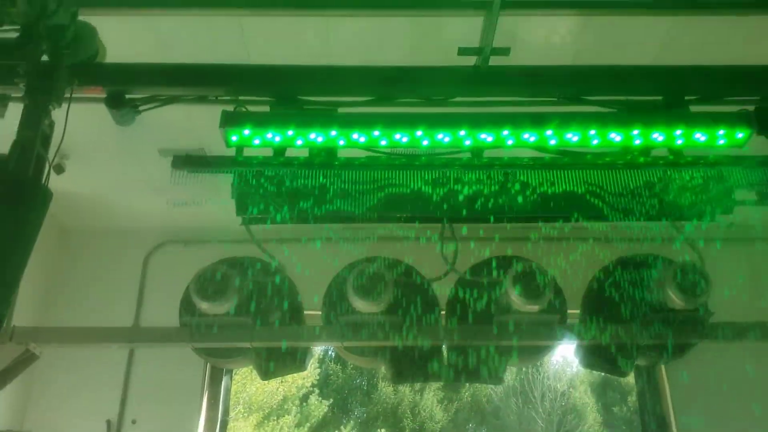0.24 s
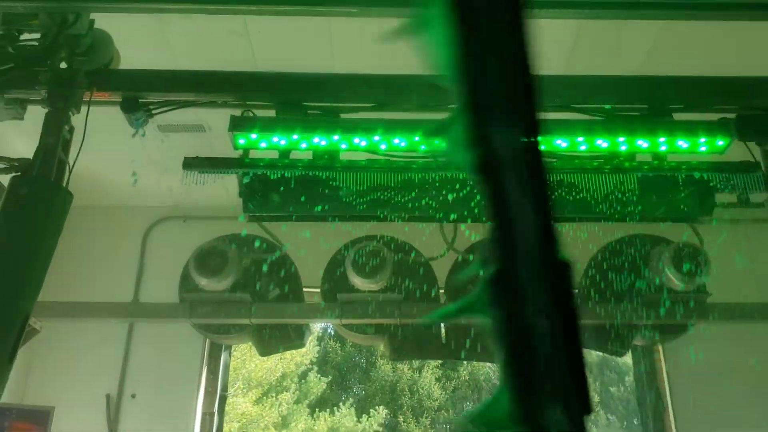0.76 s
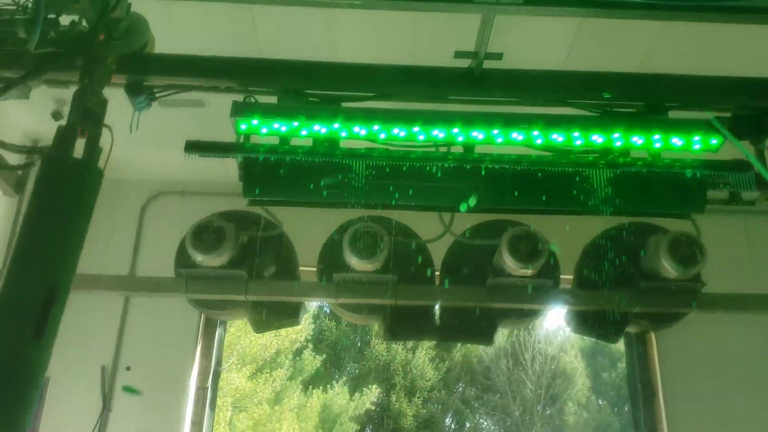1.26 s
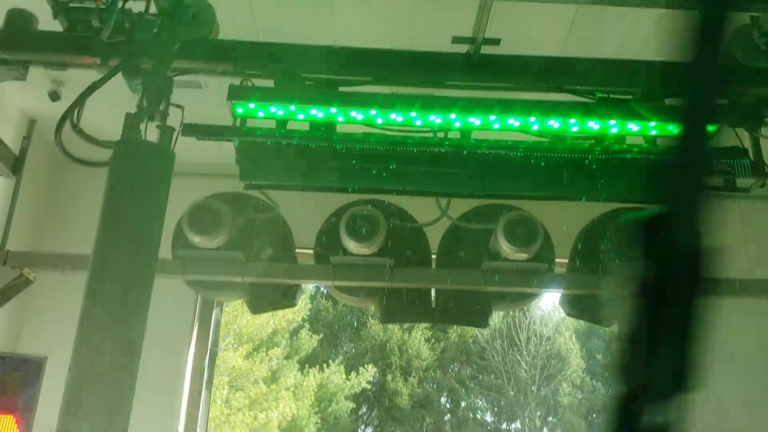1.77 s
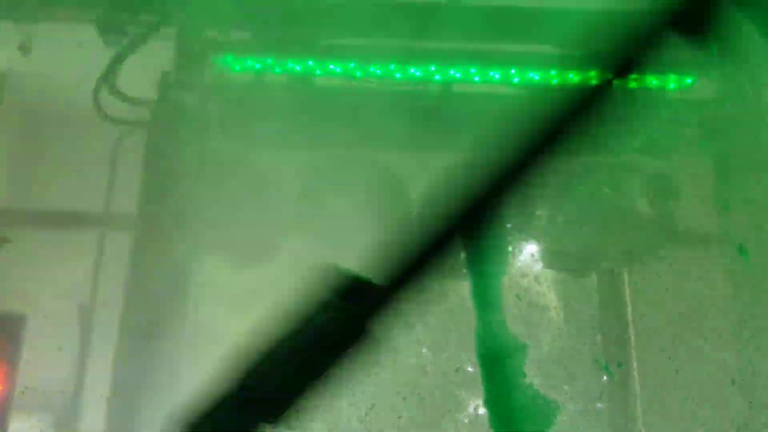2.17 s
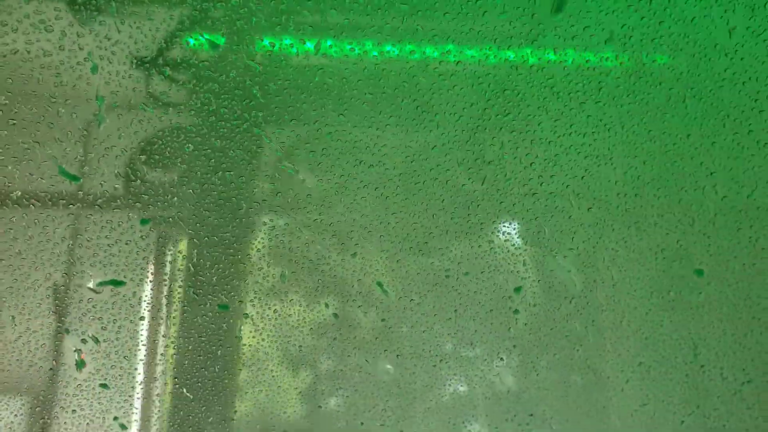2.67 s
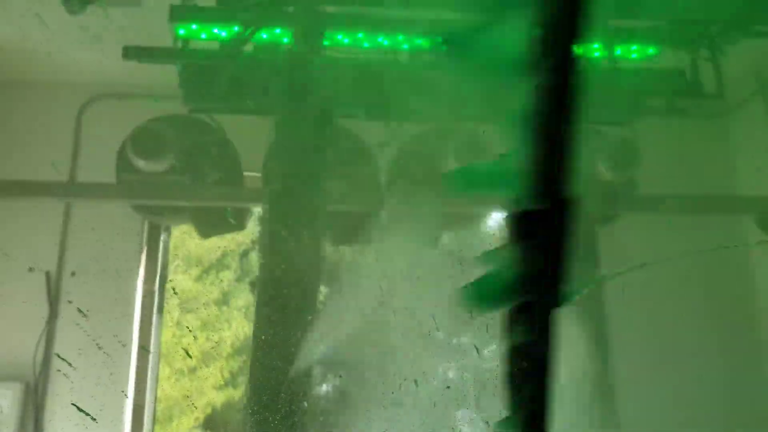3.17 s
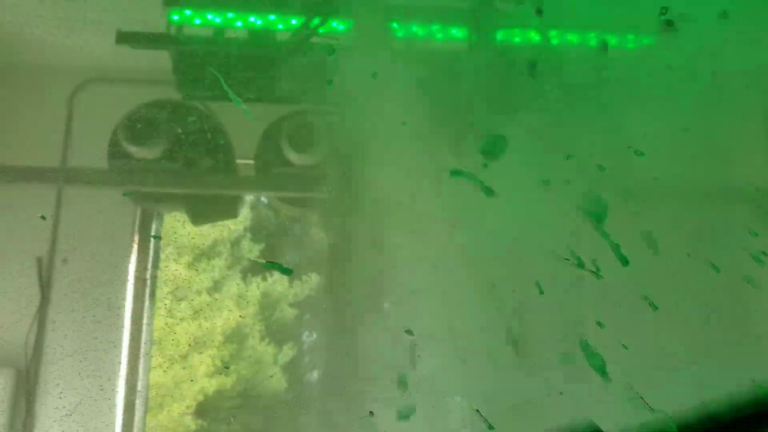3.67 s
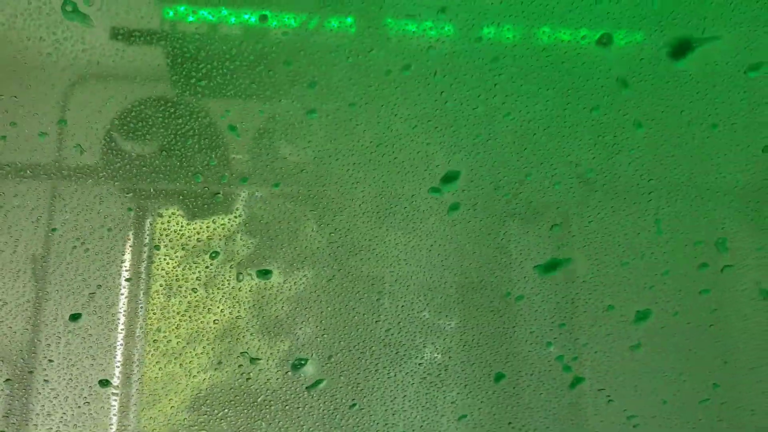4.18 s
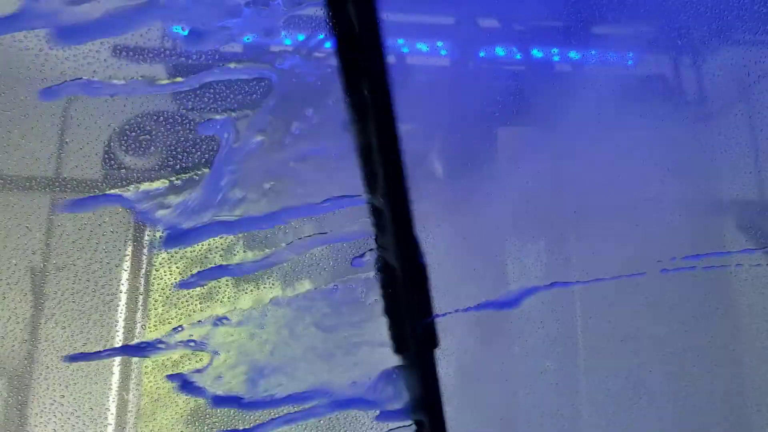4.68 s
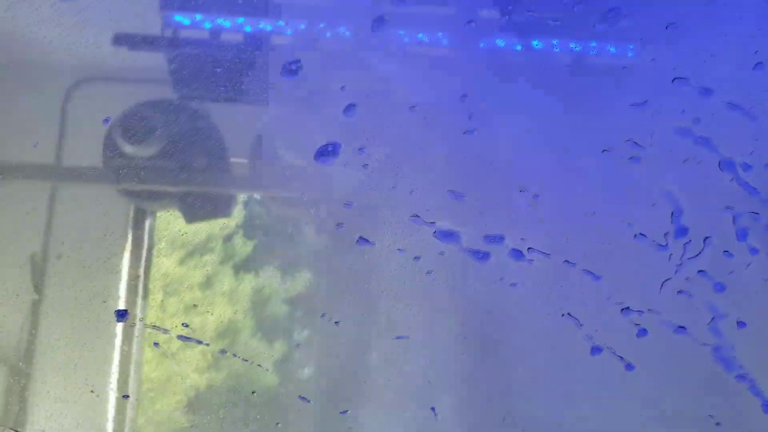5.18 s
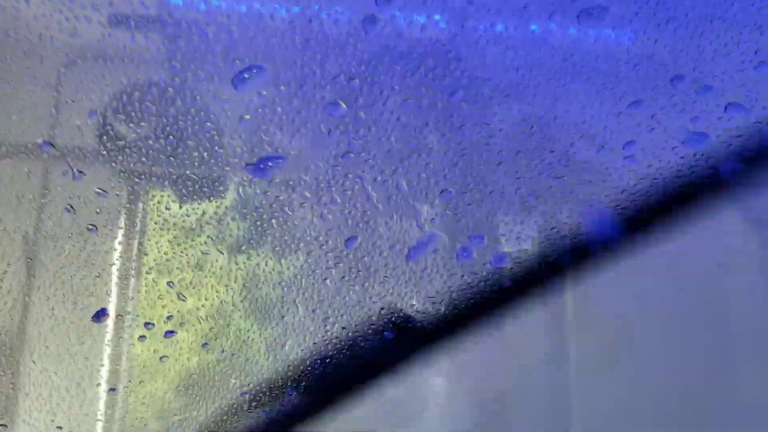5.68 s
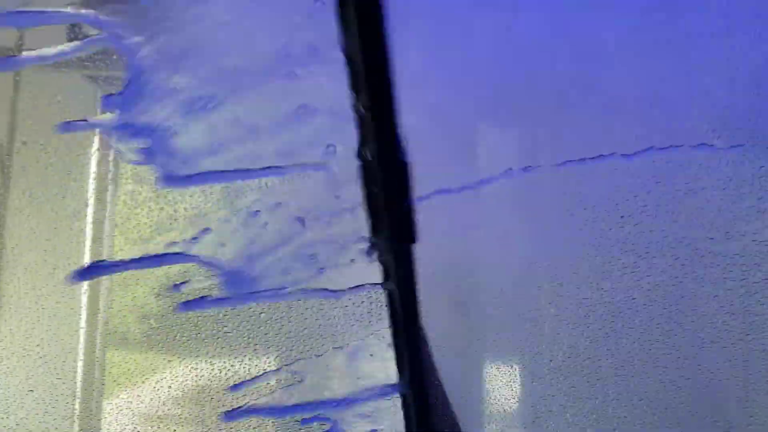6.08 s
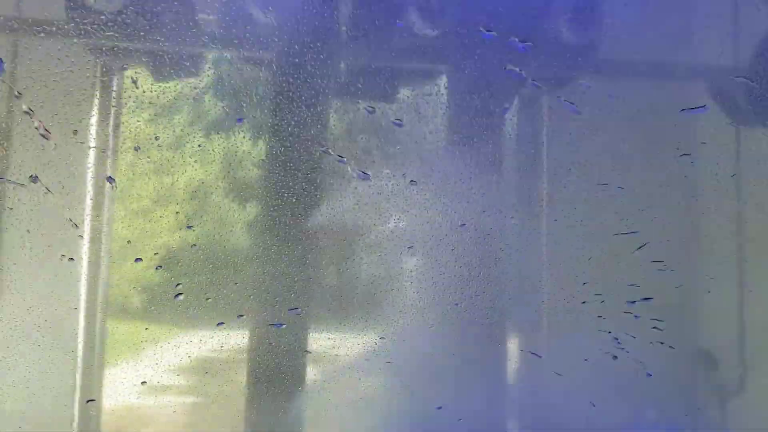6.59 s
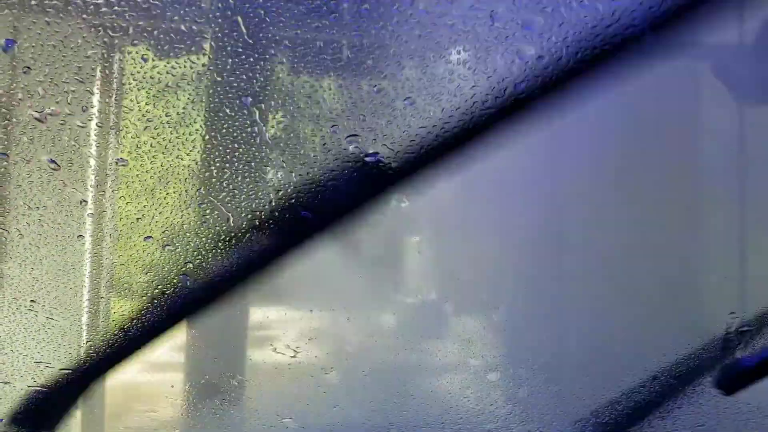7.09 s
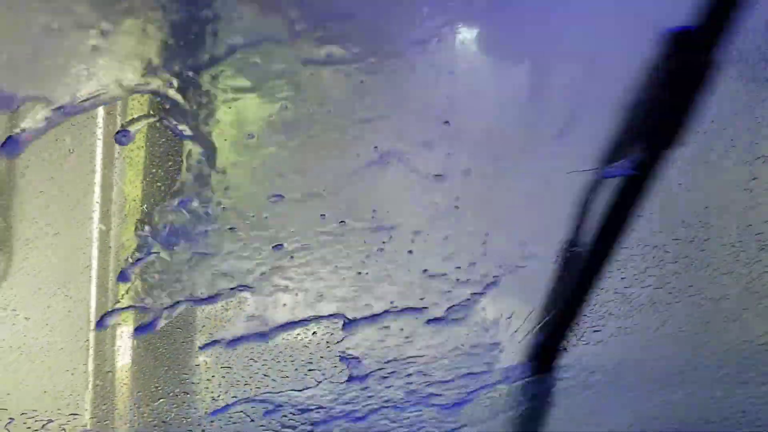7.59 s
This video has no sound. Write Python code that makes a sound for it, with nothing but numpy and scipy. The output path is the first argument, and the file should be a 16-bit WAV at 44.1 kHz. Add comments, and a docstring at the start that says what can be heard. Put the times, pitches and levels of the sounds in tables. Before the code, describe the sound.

The sound is heard from inside a closed car idling in a wash bay, with a low engine hum and a dull hiss of distant sprays. In the first second and a half the wipers give several dull slaps with a very faint motor whine. Around 1.4 to 1.6 seconds the nozzles spit and a few heavy drops tick on the windshield. Near 2 seconds a gush of water hits and makes the car body hum briefly. From then on, water drums on the roof and glass as a dense low rumble beneath a softer misty hiss. Wipers thump again at about 2.7, 4, 4.4 and 5.4 seconds. At 5.5 seconds a jet opens suddenly on the left, hissing in surges with a faint whistle through the door seal. It continues over the drumming, with a few small spits and a last wiper slap near 7.7 seconds.

```python
"""A car idles in a wash bay, heard from inside the cabin; far sprays hiss dully through shut windows.
From the start the wipers whine faintly and slap, ringing cowl and glass. Air in the line makes the
nozzles spit and heavy drops tick on the glass; near 2 s the first gush sets the body humming.
Water then drums on roof and windscreen in a hiss of mist, with more wiper slaps. From 5.5 s a surging
jet hisses against the left side and whistles faintly through the door seal."""
import sys
import numpy as np
from scipy import signal
from scipy.fft import irfft
from scipy.io import wavfile
from scipy.ndimage import uniform_filter1d

SR = 44100
rng = np.random.default_rng(int(sys.argv[2]) if len(sys.argv) > 2 else 0)


def transcribe(signal):
    """Save signal, clipped to [-1, 1], as a 16-bit WAV file at the path in sys.argv[1]."""
    frames = np.atleast_2d(signal).T
    limited = np.clip(frames, -1, 1)
    pcm = np.round(limited * 32767).astype(np.int16)
    wavfile.write(sys.argv[1], SR, pcm)


N = 345671

# stereo balance of the water, treble leaning left: pitch_hz, left_over_right_db
CABIN_BALANCE = [(60, 0), (200, 0.3), (700, 1), (1300, 0), (2400, 1), (3300, -1), (4400, 2), (5500, 5),
                 (8100, 9.5), (11000, 5), (13500, 8), (15500, 9)]


def gain_of(db):
    """Decibels to gain."""
    return 10 ** (np.asarray(db) / 20)


def panned(left_over_right_db):
    """Left and right gains, as a column."""
    return gain_of([[left_over_right_db / 2], [-left_over_right_db / 2]])


def unit_rms(x):
    """Scales to rms 1."""
    return x / np.sqrt(np.mean(x ** 2) + 1e-20)


def drift(white, size):
    """Smooths white noise over size samples into a slow wander of rms 1."""
    return unit_rms(uniform_filter1d(uniform_filter1d(white, size), size))


def at_pitch(points, hz):
    """Reads a table on a log-frequency axis."""
    point_hz, value = np.transpose(points)
    return np.interp(np.log(hz + 1), np.log(point_hz + 1), value)


def curves(rows):
    """One sample-by-sample curve per column after the time; the end values hold."""
    time_s, *columns = np.transpose(rows)
    return [np.interp(np.arange(N) / SR, time_s, column) for column in columns]


def hump(middle_s, length_s):
    """A smooth rise from 0 to 1 and back."""
    return np.cos(np.pi * np.clip((np.arange(N) / SR - middle_s) / length_s, -.5, .5)) ** 2


def arch(start_s, end_s):
    """A broad swell with steep ends."""
    return np.sin(np.pi * np.clip((np.arange(N) / SR - start_s) / (end_s - start_s), 0, 1)) ** .5


def burst(hit_s, build_s, build_db, t60_s):
    """Envelope of a blow: swells to build_db, jumps to 1 at the hit, then dies away."""
    t = np.arange(N) / SR - hit_s
    swell = gain_of(build_db) * np.clip(1 + t / build_s, 0, 1) ** .5
    return np.where(t < 0, swell, gain_of((-60 * t / t60_s).clip(-150, 0)))


def noise(colour, size, patchy_db, flicker_db, balance=CABIN_BALANCE):
    """Stereo noise of rms 1 in grains of size samples, with drifting patches and an overall flicker."""
    # how alike left and right are: pitch_hz, correlation
    stereo_likeness = [(40, .97), (80, .93), (130, .93), (200, .9), (380, .78), (700, .55), (1000, .4),
                       (1400, .25), (2400, .05), (15000, 0)]
    # phase between two spaced listening points: pitch_hz, left_lead_rad
    left_lead = [(40, 0.049), (70, 0.042), (130, 0.03), (300, 0.1), (780, 1.18), (1120, 1.95), (1500, 2.9)]
    hop = size // 4
    frames, hz = N // hop + 5, np.fft.rfftfreq(size, 1 / SR)
    a, b, c, d, patches = rng.standard_normal((5, frames, len(hz)), dtype=np.float32)
    patches = unit_rms(uniform_filter1d(uniform_filter1d(patches, size=8, axis=0), size=8, axis=1))
    flicker = unit_rms(uniform_filter1d(rng.standard_normal(frames), size=4))[:, None]
    likeness = at_pitch(stereo_likeness, hz)
    left = a + 1j * b
    right = likeness * left + np.sqrt(1 - likeness ** 2) * (c + 1j * d)
    gain = gain_of(at_pitch(colour, hz) + patchy_db * patches + flicker_db * flicker)
    side = gain_of(at_pitch(balance, hz) / 2)
    lead = np.exp(1j * at_pitch(left_lead, hz))
    grains = irfft(np.array([left * side * lead, right / side]) * gain) * np.hanning(size)
    quarters = grains.reshape(2, frames, 4, hop)
    overlapped = sum(quarters[:, 3 - k:frames - k, k] for k in range(4)).reshape(2, -1)[:, :N]
    return overlapped / np.sqrt(np.mean(overlapped.mean(0) ** 2))


def far_sprays():
    """Dull hiss from the bay, hollowed by the shut windows; its treble comes and goes early on."""
    # distant spray: time_s, level_db, treble_boost_db
    levels = [(0, -58.5, 7.5), (.3, -59, 7.5), (.45, -59.5, 3.5), (.7, -60, 4), (1.0, -61.5, 1),
              (1.3, -61.5, 2.5), (1.8, -59, 7), (2.3, -57, 0), (2.38, -57.5, 0), (2.46, -60.5, 4),
              (2.6, -57.5, 0)]
    # its spectrum through the glass: pitch_hz, level_db
    colour = [(530, -6.5), (880, -25), (960, -46), (1300, -36), (1550, -7.5), (1920, -11.5), (2500, -9),
              (2950, -7), (3850, -7.5), (5200, -13), (6800, -19.5), (7400, -23.5), (8100, -36), (8700, -30),
              (9200, -23.5), (9880, -23), (11500, -29), (12800, -35), (13500, -49), (15700, -43)]
    level_db, boost_db = curves(levels)
    hiss = noise(colour, size=512, patchy_db=1.2, flicker_db=.6)
    treble = signal.sosfiltfilt(signal.butter(4, 8500, "highpass", fs=SR, output="sos"), hiss)
    return gain_of(level_db) * (hiss + (gain_of(boost_db) - 1) * treble)


def engine():
    """Firing orders in step, so each beat is a downward pulse; the higher ones waver more."""
    # idle speed: time_s, firing_hz
    idle = [(0, 25.1), (1.05, 24.65), (7.84, 24.55)]
    # harmonics of the firing rate: order, level_db
    orders = [(1, -50), (2, -33), (3, -40), (4, -43), (5, -41), (6, -52), (7, -50), (8, -56)]
    firings = np.cumsum(curves(idle)[0]) / SR
    t, out = np.arange(N) / SR, 0
    coarse_t = t[::200]
    for order, db in orders:
        rates_hz, phases = rng.uniform(0.364, 4, (8, 1)), rng.random((8, 1))
        sways = np.sin(2 * np.pi * (rates_hz * coarse_t + phases))
        waver_db = 0.17 * order * np.interp(t, coarse_t, sways.sum(0) / 2)
        lead_rad = order * np.array([[.05], [-.05]])
        phase = 2 * np.pi * order * (firings + 1 / 8) + lead_rad
        out -= gain_of(db + waver_db) * np.sqrt(2) * np.cos(phase)
    return out * panned(1.2)


def wiper_motor():
    """Faint gear whine on the first strokes, wobbling with the uneven gears."""
    # one whine a stroke: start_s, end_s, pitch_hz, level_db
    strokes = [(.02, .18, 800, -70), (.26, .35, 872, -66), (.44, .55, 730, -65), (.95, 1.1, 790, -70),
               (1.15, 1.21, 870, -64)]
    t, out = np.arange(N) / SR, 0
    wobble_rad = 0.88 * drift(rng.standard_normal(N), size=900)
    for start_s, end_s, hz, db in strokes:
        out += gain_of(db) * np.sqrt(2) * arch(start_s, end_s) * np.sin(2 * np.pi * hz * t + wobble_rad)
    return out * panned(3)


def hum_and_whistle():
    """While the spray builds, a panel's hum and a thin whistle swell, waver and fade."""
    # the two tones: start_s, end_s, pitch_hz, level_db, waver_rad
    tones = [(1.527, 2.407, 159.1, -41.5, 0.35), (1.95, 2.42, 3220, -67, 3.7)]
    t, out = np.arange(N) / SR, 0
    for start_s, end_s, hz, db, waver_rad in tones:
        size = int(4e4 / np.sqrt(hz))  # the higher tone wavers faster
        waver, throb = (drift(white, size) for white in rng.standard_normal((2, N)))
        level = gain_of(db + 3.5 * throb) * arch(start_s, end_s)
        out += level * np.sqrt(2) * np.sin(2 * np.pi * hz * t + waver_rad * waver)
    return out


def mist():
    """Spray all round the car: smooth hiss, fizz, haze and sparkle, rising as the nozzles prime."""
    # body of the spray: time_s, hiss_db, fizz_db
    spray_levels = [(1.2, -74, -97), (1.5, -68, -88), (1.62, -70, -74), (1.7, -63.5, -71),
                    (1.79, -62.5, -70), (1.85, -59, -66), (1.92, -63, -68), (1.96, -50, -61),
                    (2.04, -52, -63), (2.09, -58, -65), (2.18, -57.5, -66), (2.3, -64, -69),
                    (2.43, -63, -70), (2.55, -63, -68), (3.05, -60, -68), (3.3, -57, -68.5),
                    (3.6, -56.5, -67), (4, -59, -69), (4.75, -58.5, -69), (5.45, -59, -69),
                    (5.55, -55, -68), (7.84, -58.5, -72)]
    # even haze of fine droplets: time_s, level_db
    haze_levels = [(1.8, -78), (2.3, -71), (2.8, -68), (3.2, -64), (3.8, -65), (4.2, -65), (4.8, -65.5),
                   (5.4, -66), (6.2, -71), (7.84, -68)]
    # finest sparkle, surging as water sweeps the glass: time_s, level_db
    sparkle_levels = [(1.65, -74), (1.77, -81), (1.84, -68), (1.91, -74), (1.92, -72), (2.16, -70),
                      (2.3, -79), (2.37, -65), (2.42, -76), (2.6, -84), (2.73, -78), (3.1, -87),
                      (3.15, -73), (4.39, -77), (4.49, -73), (4.6, -81), (4.75, -73), (4.8, -79),
                      (4.91, -72), (5.03, -80), (5.1, -74), (5.27, -79), (5.37, -75), (5.99, -72.5),
                      (6.06, -78), (6.34, -74.5), (6.36, -70), (6.51, -81.5), (6.61, -71), (6.75, -75),
                      (6.89, -73), (6.91, -65), (6.96, -77), (7.41, -72.5), (7.44, -79), (7.68, -73),
                      (7.7, -61), (7.72, -71.5), (7.79, -79), (7.84, -78)]
    # spectra of hiss, fizz and sparkle: pitch_hz, level_db
    hiss_colour = [(530, -19), (900, 0.5), (1010, -2), (1410, -2.5), (1530, -5.5), (2140, -4.5),
                   (2820, -15), (3270, -10.5), (5350, -6.5), (6250, -31), (6850, -31), (8000, -37),
                   (10400, -57), (17600, -120)]
    fizz_colour = [(5000, -36), (7500, -4.5), (8660, -4), (9600, -6), (11500, 1), (12600, -4), (13500, -14),
                   (15700, -23)]
    sparkle_colour = [(11000, -26), (12500, -3), (13300, 0), (14200, -3), (15000, -6), (15700, -8)]
    hiss_db, fizz_db = curves(spray_levels)
    hiss = gain_of(hiss_db) * noise(hiss_colour, size=512, patchy_db=2.5, flicker_db=0.14)
    fizz = gain_of(fizz_db) * noise(fizz_colour, size=512, patchy_db=1.5, flicker_db=.3)
    low_cut = signal.butter(2, 1500, "highpass", fs=SR, output="sos")
    haze = gain_of(curves(haze_levels)[0]) * signal.sosfilt(low_cut, rng.standard_normal((2, N)))
    primed = np.clip((np.arange(N) / SR - 1.55) / .15, 0, 1)
    sparkle = noise(sparkle_colour, size=512, patchy_db=2.0, flicker_db=-1.0)
    return hiss + fizz + haze + primed * gain_of(curves(sparkle_levels)[0]) * sparkle


def drop_ticks():
    """Heavy drops ring the modes of the glass, each a little differently."""
    # drops landing: start_s, level_db, centre_hz, octave_away_db
    drops = [(1.3645, -40, 4000, -4), (1.463, -55, 3800, -3), (1.6045, -37, 2300, -22),
             (2.3825, -37, 3000, -2)]
    # modes of the glass: pitch_hz, level_db, t60_s
    glass_modes = [(850, -15, 0.037), (1160, -9, 0.049), (1620, -4.5, 0.026), (2000, -5, 0.023),
                   (2330, -6.5, 0.045), (2660, -6.5, 0.027), (3500, -0.5, 0.023), (4350, -6, 0.025),
                   (4540, -3, 0.03), (5200, -6, 0.026)]
    hz, mode_db, t60_s = np.transpose(glass_modes)[:, :, None]
    out, t = np.zeros((2, N + SR)), np.arange(SR // 10) / SR
    attack = np.minimum(t / 0.0005, 1)
    for start_s, db, centre_hz, octave_away_db in drops:
        phase = rng.random((len(hz), 1)) + 1.5 * rng.random((2, len(hz), 1))  # roughly in step
        struck_db = db + mode_db + octave_away_db * np.log2(hz / centre_hz) ** 2
        modes = gain_of(struck_db - 60 * t / t60_s) * np.sin(2 * np.pi * hz * t + phase)
        out[:, round(start_s * SR):][:, :len(t)] += modes.sum(1) * attack
    return out[:, :N]


def nozzle_spits():
    """Air in the line: a hiss builds, the slug of water lands, and it is over. The long one near 1.93 s is the
    hiss of the first gush pouring down."""
    # spits: hit_s, body_db, snap_over_body_db, fizz_over_body_db, t60_s, build_s, build_db,
    # left_over_right_db
    spits = [(0.627, -51, -11, -36, 0.14, 0.0047, -22, 1),
             (1.3652, -45.5, -1, -8.5, 0.069, 0.032, -11.5, 0), (1.462, -54.5, 1, -12, 0.074, .005, -10, 1),
             (1.565, -63, 4, 0, 0.22, .004, -26, 2), (1.606, -47.5, -0.5, 0.5, 0.028, 0.024, -8, -2),
             (1.926, -51.5, 2.5, -5, 1, 0.013, -16, -1), (2.095, -69, 14, -6, 0.26, .02, -8, -1),
             (3.37, -57.5, 4.5, -14, 0.065, 0.027, -5.5, 0), (4.05, -62, 10, -9, 0.045, 0.014, -11, 0),
             (2.382, -49.5, 1, -2, 0.025, 0.045, -8, -2), (6.605, -49, -7, -16, 0.063, 0.033, -13, -4),
             (6.909, -53.5, -5, -2, .06, .015, -8, -0.5), (7.699, -60, -2, 3, .06, .01, -8, 1)]
    # spectra of a spit's body, snap and top fizz: pitch_hz, level_db
    body_colour = [(600, 2.5), (1100, -6), (1800, 3.5), (2400, -5.5), (3000, -21), (4000, -36)]
    snap_colour = [(2000, -34), (2800, 2.5), (3600, 3), (4600, -0.5), (5600, -0.5), (6500, -11.5),
                   (8000, -19)]
    fizz_colour = [(6500, -34), (8500, -8), (10000, 1), (11200, 0), (12300, 9), (13300, -2), (14300, -3),
                   (15700, -12)]
    body, snap, fizz = (noise(colour, size=256, patchy_db=.8, flicker_db=.4)
                        for colour in (body_colour, snap_colour, fizz_colour))
    out = np.zeros((2, N))
    for hit_s, db, snap_db, fizz_db, t60_s, build_s, build_db, pan_db in spits:
        level = burst(hit_s, build_s, build_db, t60_s)
        fizz_level = burst(hit_s - 0.0029, build_s, 0.92 * build_db, t60_s)  # earlier, fuller build-up
        spit = level * (body + gain_of(snap_db) * snap) + gain_of(fizz_db) * fizz_level * fizz
        out += gain_of(db) * panned(pan_db) * spit
    return out


def side_jet():
    """A jet opens at once on the left and surges; a faint whistle builds in a gap of the door seal."""
    # pressure surges: middle_s, length_s, rise_db
    surges = [(5.535, 0.25, 2.5), (5.76, 0.29, 3), (5.98, .19, 3), (6.188, .16, 2), (6.388, 0.13, 5),
              (6.62, 0.24, 5.5), (6.834, 0.12, 3.5), (6.908, 0.084, 5), (7.093, .12, 3.5),
              (7.213, 0.13, 2.5), (7.372, 0.17, 3.5), (7.496, 0.11, 2), (7.64, 0.2, 3), (7.774, 0.2, 2.5)]
    # spectrum of the jet: pitch_hz, level_db
    colour = [(710, 0.5), (1200, -4.5), (1420, -2), (1560, -6), (1850, -2.5), (2460, -4), (4180, -6.5),
              (5440, -2.5), (6110, -12.5), (6720, -6.5), (7300, -17.5), (7870, -25), (8570, -23),
              (9200, -12.5), (9730, -9), (11000, -14), (12400, -18), (13300, -29), (15000, -38)]
    # its pull to the left: pitch_hz, left_over_right_db
    balance = [(1000, 13), (2400, -2), (3300, 9), (4200, 16.5), (5500, 25), (6700, 14.5), (8000, 22),
               (9700, 14), (11500, 12.5), (13800, 24), (15300, 14)]
    open_s, base_db = 5.485, -53
    whistle_hz, width_hz, whistle_db, build_s = 5540, 220, -3, 0.18
    t = np.arange(N) / SR - open_s
    level_db = base_db + sum(db * hump(middle_s, length_s) for middle_s, length_s, db in surges)
    hiss = noise(colour, size=1024, patchy_db=0.5, flicker_db=0.8, balance=balance)
    whistle = signal.lfilter(*signal.iirpeak(whistle_hz, whistle_hz / width_hz, fs=SR), hiss)
    whistle *= gain_of(whistle_db) * np.clip(t / build_s, 0, 1)
    return np.clip(t / 0.0041, 0, 1) * gain_of(level_db) * (hiss + whistle)


def wiper_slaps():
    """The blades flip and slap: a push and a short rough scuff into the modes of cowl and glass."""
    # slaps: start_s, level_db, knock_db, click_db, scuff_s, left_over_right_db, cutoff_hz
    slaps = [(.346, -42, 8, -20, 0.018, 5, 600), (.357, -22.5, -5, -37, 0.012, 0.5, 500),
             (.374, -38, 6, -1, .02, 6, 1300), (0.388, -35.5, 8, 8, 0.024, -1, 950),
             (.654, -44, 4, -12, 0.047, 4, 1530), (0.750, -36.5, 8, 3, 0.037, 1, 1200),
             (0.819, -30, -13, -33, 0.032, 1, 595), (0.912, -38.5, 9, 7, 0.032, 1, 1050),
             (1.259, -40, 8, -20, 0.016, 5, 600), (1.264, -23.5, -13, -39, 0.014, 1, 500),
             (1.281, -41, 8, -12, 0.013, 0, 700), (1.297, -38, -2, 1, 0.038, 0, 1410),
             (1.454, -44, -13, -1, .03, -2, 1500), (2.65, -26, -8, -17, .04, 1, 1500),
             (4.05, -25, -8, -19, 0.024, 0, 1200), (4.368, -25.5, -15, -22, 0.058, -1, 1000),
             (5.32, -24.5, -7, -19, 0.023, 2, 1000), (5.434, -22.5, -10, -23, 0.032, 0, 1000),
             (7.696, -24.5, -10, -38, 0.0074, -21.5, 980)]
    # modes of cowl and glass: pitch_hz, width_hz, level_db
    cowl_modes = [(84, 220, 12.5), (164.6, 28.5, 5.5), (233, 91, -12), (457, 62, 14.5), (537, 89, 7),
                  (730, 210, 21), (950, 150, -18), (1200, 220, 3), (1670, 300, -2)]
    out, t = np.zeros((2, N + SR)), np.arange(SR // 4) / SR
    push = 2.0 * np.exp(-((t - .003) / .001) ** 2)
    low_cut = signal.butter(2, 60, "highpass", fs=SR, output="sos")  # the slaps carry no deep bass
    for start_s, db, knock_db, click_db, scuff_s, pan_db, cutoff_hz in slaps:
        grit = rng.standard_normal(len(t)) + .5 * rng.standard_normal((2, len(t)))
        scuff = grit * gain_of(-60 * np.minimum(t / scuff_s, 2) ** 3) * np.minimum(t / 0.0013, 1)
        ring = 0
        for hz, width_hz, mode_db in cowl_modes:
            band_db = 0 if hz < 350 else knock_db if hz < 680 else click_db
            ring += gain_of(mode_db + band_db) * np.exp(-np.pi * width_hz * t) * np.sin(2 * np.pi * hz * t)
        ring *= np.minimum(t / 0.0002, 1)
        slap = signal.fftconvolve(push + scuff, ring[None], axes=1)[:, :len(t)]
        soft_rubber = signal.butter(4, cutoff_hz, fs=SR, output="sos")
        slap = signal.sosfilt(soft_rubber, signal.sosfilt(low_cut, slap))
        loudest_rms = np.sqrt(uniform_filter1d(slap.mean(0) ** 2, size=400).max())
        out[:, round(start_s * SR):][:, :len(t)] += gain_of(db) * panned(pan_db) * slap / loudest_rms
    return out[:, :N]


def gush():
    """Water pours on the body, which hums in a few narrow modes."""
    # the first full gush, settling to a steady pour: time_s, level_db
    levels = [(1.6, -49), (1.8, -42), (1.92, -31), (1.98, -27), (2.1, -36.5), (2.3, -42.5), (2.6, -40)]
    # modes of the body: pitch_hz, width_hz, level_db
    body_modes = [(86, 7.4, 4.5), (159, 9.3, 1), (214.4, 13.4, -3.5), (325.5, 34, -9.5), (440, 140, -18),
                  (593, 51, -19), (696, 92, -30)]
    hz = np.arange(40, 5000, 2)
    power = sum(gain_of(2 * db) / (1 + (2 * (hz - mode_hz) / width_hz) ** 2) ** 2
                for mode_hz, width_hz, db in body_modes)
    colour = np.c_[hz, 10 * np.log10(power)]
    return gain_of(curves(levels)[0]) * noise(colour, size=8192, patchy_db=.3, flicker_db=.1)


def drumming():
    """Water shakes the big panels, the cabin air, the roof sheet, the glass and one door skin."""
    # water on the car: time_s, panels_db, roof_db, glass_db, cabin_air_db
    levels = [(0, -31, -48, -52.5, -26.5), (.25, -37, -52, -54.5, -55), (.55, -38, -51.5, -54, -58),
              (1.1, -38, -47.5, -54.5, -45), (1.55, -35, -51, -57, -58), (1.85, -40, -46, -52.5, -31.5),
              (2.2, -37, -44.5, -52, -40), (2.5, -52, -38.5, -48, -49), (2.75, -47, -42.5, -46.5, -39),
              (3.1, -34.5, -38, -49, -55), (3.4, -28.5, -43.5, -45.5, -42), (3.65, -44, -41, -45.5, -26.5),
              (4.1, -28.5, -42, -44.5, -39), (4.5, -37.5, -38.5, -44.5, -34.5),
              (5.15, -37, -39.5, -45, -34), (5.5, -30, -37, -43.5, -30.5), (5.95, -31.5, -39.5, -43, -45),
              (6.2, -27, -37, -46.5, -33.5), (6.6, -38, -39, -44.5, -32), (7.2, -33, -35.5, -46.5, -41),
              (7.84, -35, -39.5, -46.5, -52)]
    # shudders under wiper turns and gusts of spray: middle_s, length_s, panels_db, roof_db, glass_db
    shudders = [(0, 0.067, -27.5, -58, -42.5), (0.41, 0.095, -31.5, -40, -51),
                (0.833, 0.17, -35, -41, -48.5), (0.905, 0.19, -27.5, -59, -62),
                (1.317, 0.19, -33.5, -39.5, -49), (1.972, 0.12, -29, -34, -61),
                (2.664, 0.18, -28, -42, -50), (2.942, 0.089, -29, -41, -47), (3.15, .1, -34, -40, -56),
                (3.275, 0.21, -42, -37, -53), (3.85, 0.074, -31, -44, -52),
                (3.954, 0.049, -42.5, -39, -51.5), (4.038, 0.067, -26, -36, -47),
                (4.588, 0.094, -29, -48, -54), (4.712, 0.074, -26.5, -35, -55),
                (5.35, 0.21, -34, -34.5, -44), (7.697, 0.11, -55, -32.5, -43.5)]
    # hum of the door skin: time_s, level_db
    door_levels = [(0, -40), (1.8, -60), (2.3, -44), (2.8, -40.5), (3.3, -36), (3.8, -41), (4.2, -36.5),
                   (4.8, -37), (5.4, -39.5), (6.2, -38), (7, -40), (7.84, -48)]
    # spectrum of each shaken part: pitch_hz, level_db
    panel_colour = [(40, -67), (52, 2), (60, 4), (75, -3.5), (100, -4), (122, -2.5), (135, -5),
                    (150, -16.5), (200, -39), (330, -120)]
    air_colour = [(26, -25), (34, -23), (41, 5), (45, 17.5), (53, 4), (62, -24), (80, -70), (160, -120)]
    roof_colour = [(82, -10), (140, -1.5), (178, -1), (210, -14.5), (248, -7.5), (310, -24), (400, -16),
                   (680, -120)]
    glass_colour = [(170, -15), (290, 4), (328, -6.5), (356, -4), (438, -8.5), (521, -17.5), (757, -14),
                    (842, -17.5), (1100, -25.5), (1430, -28.5), (2420, -120)]
    door_colour = [(85, -35), (108, 1), (124, 5), (140, -9.5), (165, -12), (220, -54.5), (400, -120)]
    *steady_db, air_db = curves(levels)
    shudder_power = sum(np.outer(gain_of(db) ** 2, hump(middle_s, length_s))
                        for middle_s, length_s, *db in shudders)
    panel_gain, roof_gain, glass_gain = np.sqrt(gain_of(steady_db) ** 2 + shudder_power)
    door_gain = gain_of(curves(door_levels)[0])
    panels = panel_gain * noise(panel_colour, size=4096, patchy_db=3.0, flicker_db=1.0)
    boom = gain_of(air_db) * noise(air_colour, size=4096, patchy_db=0.4, flicker_db=1.5)
    roof = roof_gain * noise(roof_colour, size=2048, patchy_db=1.07, flicker_db=0.0)
    patter = glass_gain * noise(glass_colour, size=1024, patchy_db=2.0, flicker_db=1.77)
    door = door_gain * noise(door_colour, size=4096, patchy_db=-1.4, flicker_db=2.5)
    return boom + panels + door + roof + patter


def scene():
    """Engine, water and wipers as heard in the cabin, in stereo."""
    bed = engine() + drumming() + gush() + far_sprays() + mist()
    return (bed + side_jet() + nozzle_spits() + drop_ticks() + hum_and_whistle()
            + wiper_slaps() + wiper_motor())


def record(dry):
    """Adds faint microphone hiss, then cuts the highest treble steeply."""
    hiss_db, cutoff_hz = -99, 15720
    hissy = dry + gain_of(hiss_db) * rng.standard_normal(dry.shape)
    padded = np.pad(hissy, ((0, 0), (511, 511)), "reflect")
    lowpass = signal.firwin(1023, cutoff_hz, window=("kaiser", 9), fs=SR)
    return signal.oaconvolve(padded, lowpass[None], "valid", axes=1)


dry = scene()
out = record(dry)
transcribe(out)
```